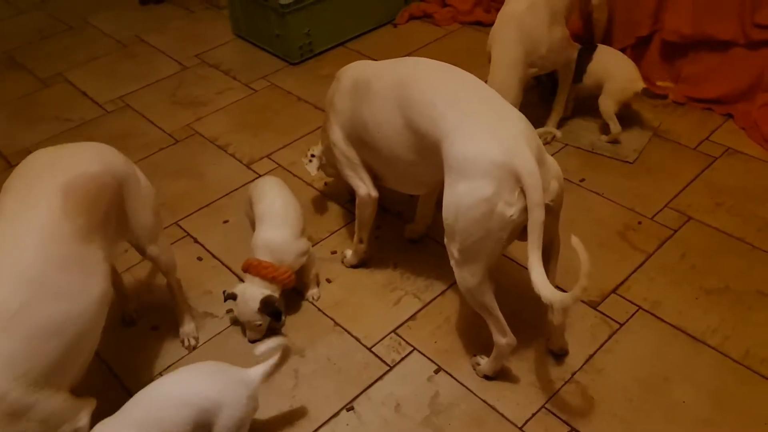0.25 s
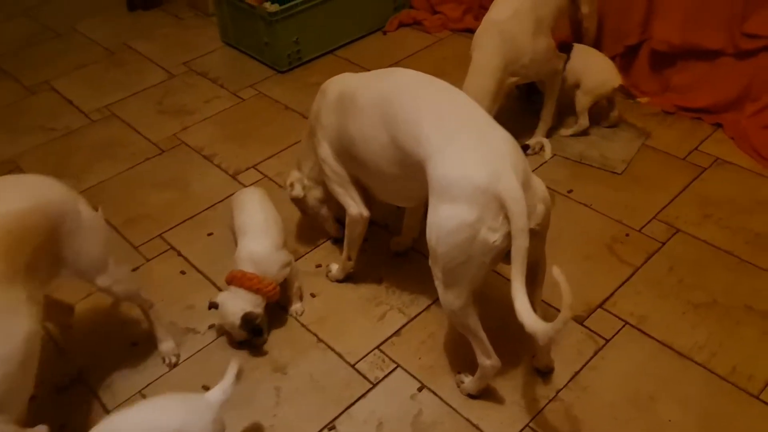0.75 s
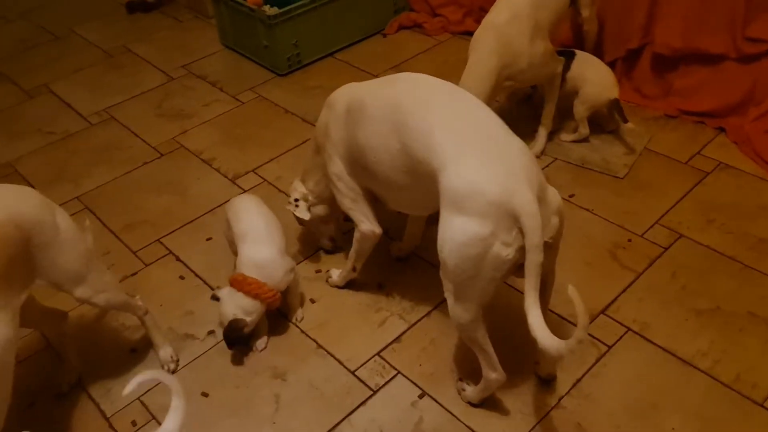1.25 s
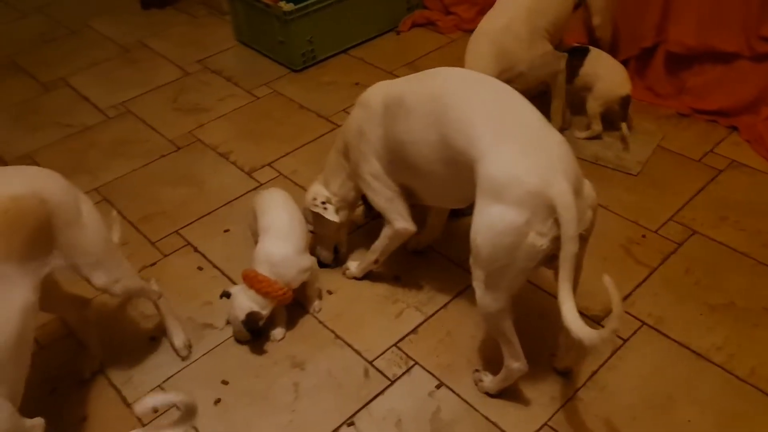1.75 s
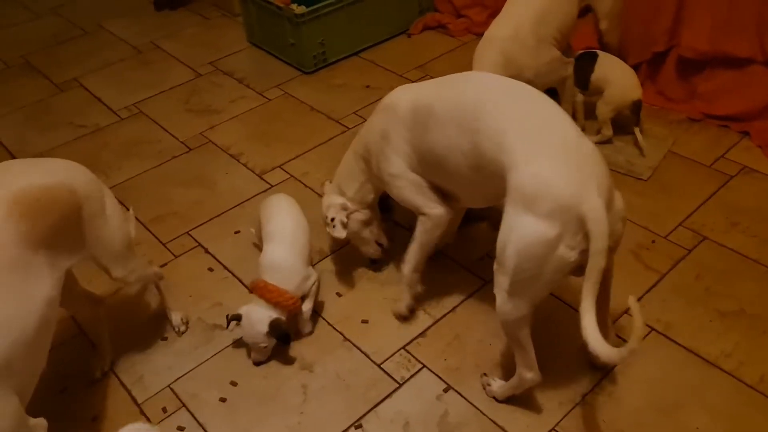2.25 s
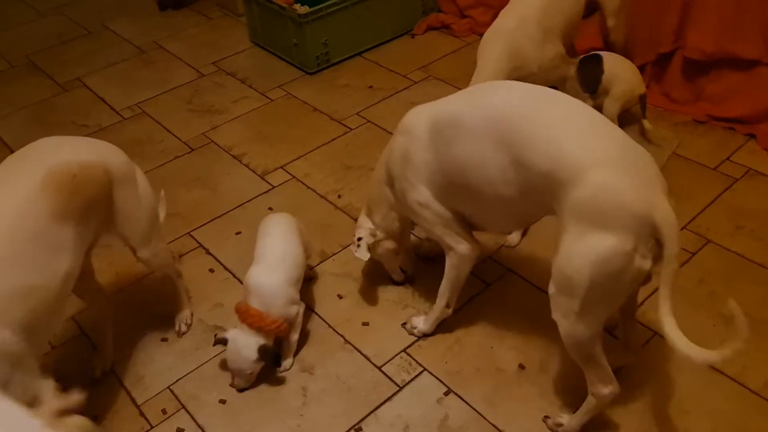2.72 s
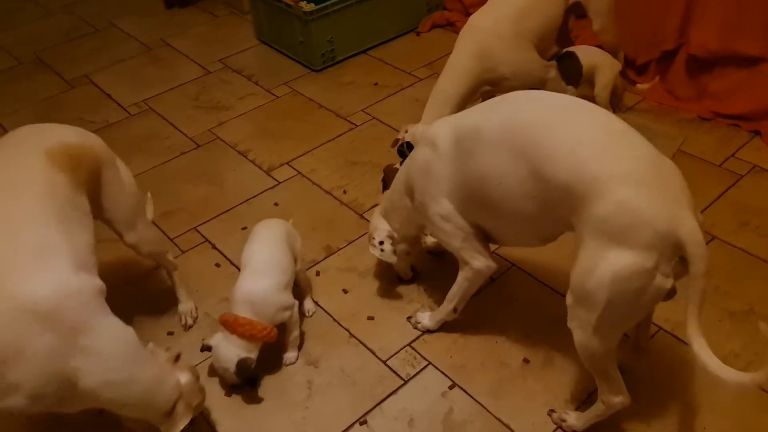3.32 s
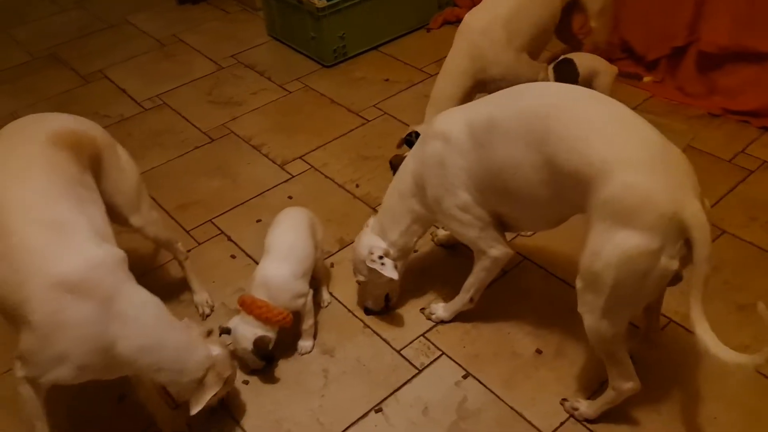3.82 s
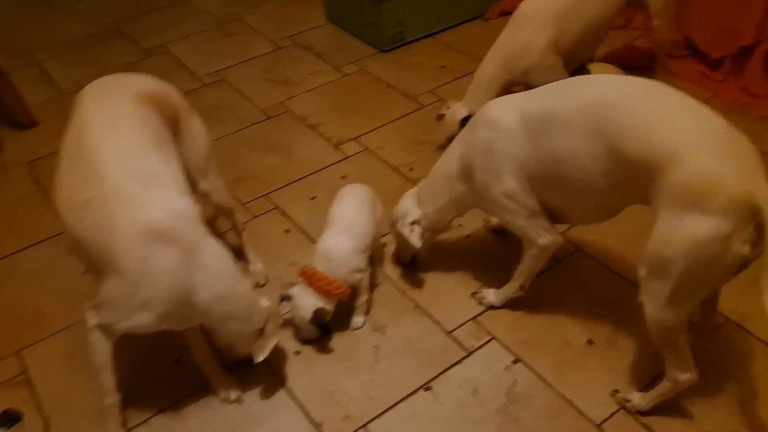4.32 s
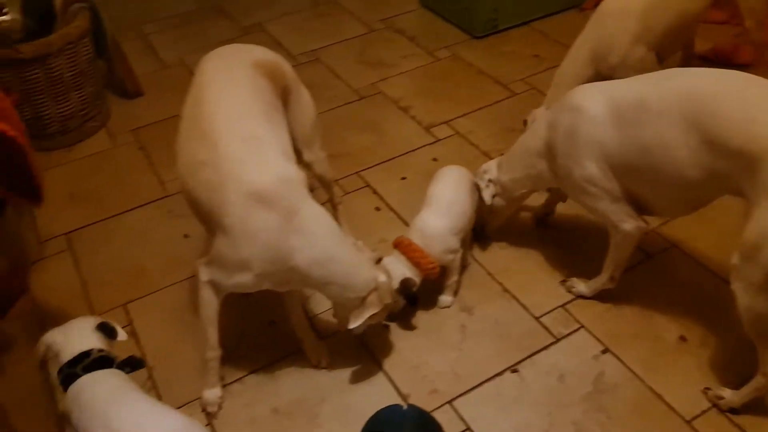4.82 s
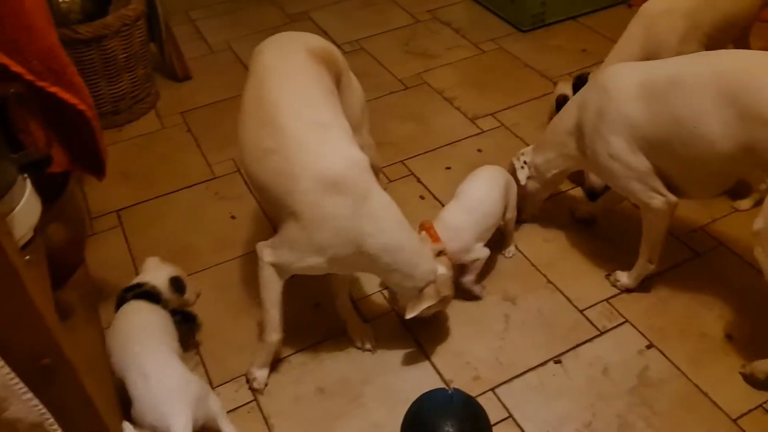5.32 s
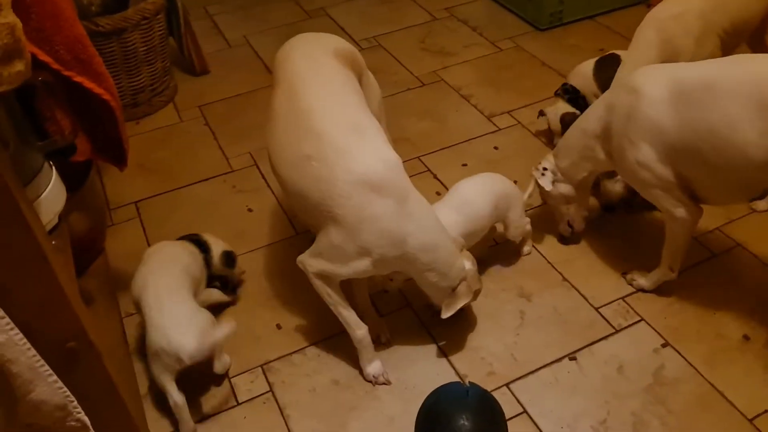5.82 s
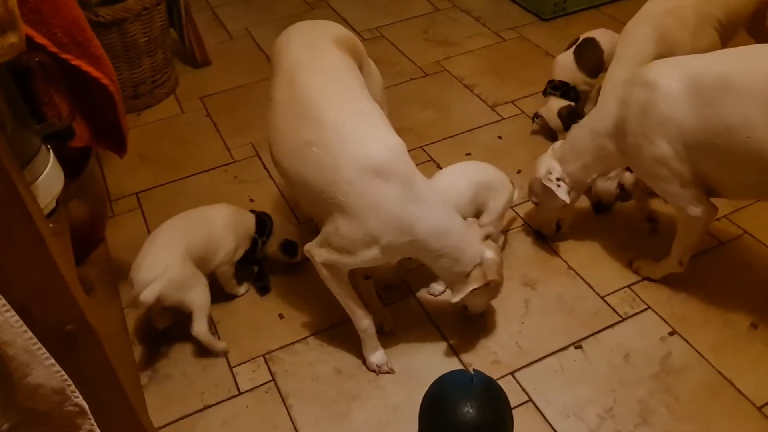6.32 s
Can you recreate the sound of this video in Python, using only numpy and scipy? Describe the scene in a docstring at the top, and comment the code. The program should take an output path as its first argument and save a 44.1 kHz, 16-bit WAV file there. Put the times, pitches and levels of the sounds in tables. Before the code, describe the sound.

Dogs and puppies eat scattered dry kibble off a tiled kitchen floor: one loud burst of crunching, then faint snuffles, clicks and ticks.

```python
"""Pellets of dry kibble crack between the teeth of dogs and puppies eating off a tiled floor in a small hard room.
Cracks are short noise bursts through pellet, jaw and treble bands; smacks are two mouth modes; snuffles are
fluttering noise through a nose resonance and a sinking hollow. Soft bodies thud, claws and crumbs tick.
Scattered echoes surround them, an appliance hums under room hiss, and two spaced microphones listen."""
import sys
import numpy as np
from scipy import signal
from scipy.fft import rfft, irfft, next_fast_len
from scipy.io import wavfile
from scipy.ndimage import uniform_filter1d

SR = 44100
rng = np.random.default_rng(int(sys.argv[2]) if len(sys.argv) > 2 else 0)


def waveform_to_disk(signal):
    """Save audio, clipped to [-1, 1], as 16-bit WAV at the path in sys.argv[1]."""
    frames = np.transpose(np.atleast_2d(signal))
    scaled = np.clip(frames, -1, 1) * 32767
    samples = np.round(scaled).astype(np.int16)
    wavfile.write(sys.argv[1], SR, samples)


N = 289296  # samples

# Levels in these tables are source levels, ahead of the room, mix and microphones.
# Pellets breaking and claws on tile. Each row: start in seconds, level in dB, centre in Hz, treble snap in dB
# against the body, jaw knock in dB against the body, left over right in dB, room send in dB.
CRACKS = [(0.0064, -24, 2800, 0.5, -21, -6.5, -3), (0.0232, -45.5, 2880, 3, -5, 2, 12),
          (0.4933, -50, 4170, -11, -28, -2.5, -7), (0.5409, -41, 2660, -25, -35, -7, -10),
          (0.5457, -41.5, 2590, -18, -36, -4, 2), (0.563, -37.5, 3830, 3, -14, -4, -9),
          (0.5985, -52, 4400, -5, -15, -3.5, -2), (0.6316, -45.5, 2830, -10, -7, -1, 4.5),
          (0.9131, -44.5, 2400, -1, -4, -1, 7), (0.989, -34, 2900, -15, -10, -11, -6),
          (1.021, -38.5, 2380, 0, -9, 2, 0.1), (1.0705, -36, 3100, 11, 8, -7, 3),
          (1.1052, -42, 3040, -2, 11, -2, 4.5), (1.3277, -10, 3860, 11.5, -19, -11.5, -8.5),
          (1.3295, -15, 3350, 10, -33, -5, 0), (1.3452, -28, 2550, -2, -24, 6, 3),
          (1.3712, -12, 3100, -12, -18, -8.5, -5), (1.391, -9.5, 3500, 11.5, -18.5, -6.5, -4),
          (1.4069, -11.5, 2960, 3.5, -31, -4.5, -0.1), (1.4726, -6, 3370, 9, -13, -13, -7),
          (1.4757, -3, 3440, 16, -16, -1, -4.5), (1.4803, -12.5, 5470, -1, -13, -24, -8),
          (1.4976, -23.5, 2450, -9, -18, -6, 1), (1.5346, -22, 2410, -14, -12.5, 1.5, -3),
          (1.659, -38, 1810, 1, -19, -4, 2), (1.6826, -22.5, 4990, 4, -19.5, -6, -2),
          (1.6854, -27, 2650, 3, -30, -12, -5), (1.689, -25, 3420, 0.5, -21, -2, -1),
          (1.7034, -16, 3020, 10, -15, -9, -8), (1.708, -22, 2500, 10, -12, -12, 4),
          (1.7336, -12.5, 2900, 1.5, -17.5, -4.5, -0.5), (1.8437, -22, 3200, 9, -23, 4, -13),
          (1.8465, -13, 3000, 9, -24, -5.5, 0.8), (1.8544, -16.5, 2450, 10, -27, -7.5, -13),
          (1.8679, -19.5, 4160, 4.5, -16, 0, -1.5), (1.957, -23, 2450, 13, -44, -4.5, 0.5),
          (1.967, -38, 2610, 6, -22, -2, 3), (1.9966, -35.5, 3100, -3, -16, -4, 4),
          (2.002, -24, 3550, 11, -26, -6, -1), (2.0364, -26, 6020, 12, -26, -4, 0.1),
          (2.0428, -16, 2540, 19, -39, -5, -3.5), (2.0468, -24, 4050, -0.5, -29, -4, -3.5),
          (2.0529, -28, 1940, 8, -28, -5.5, -1.8), (2.137, -32.5, 3470, -9, -11, -7, 0.1),
          (2.158, -29.5, 3290, 3, -25, -9, -18), (2.1747, -31, 2550, 14, -11, -3, -1.5),
          (2.226, -44.5, 3060, 7, -3, -11, 9), (2.4937, -31, 2500, -18, -37, -9, -13),
          (2.5335, -36, 3940, -22, -22, -4, -0.5), (2.5778, -43, 4500, 4, -15, -4, 2),
          (2.8924, -42, 1880, 35, -13, -1, -3), (2.97, -37.5, 3440, -10, -31, -3, 13.5),
          (3.1282, -34.5, 1860, -5, 8, -5, 2), (3.276, -37, 1950, -17, -17, -3, -1.5),
          (3.3126, -44, 1920, 9, -6, -4, 8.5), (3.368, -30.5, 2290, 7, -25, -4, 3),
          (3.487, -32.5, 2900, -18, -34, 0, -8), (3.495, -31.5, 2770, -16, -32, -8, -18),
          (3.504, -39.5, 3230, 6, -10.5, -0.5, 7.5), (3.5987, -44.5, 1820, -12, -12, 4, 0),
          (3.7458, -42, 5740, 7.5, -12, -5.5, 4.5), (3.903, -42, 1860, -5, -29, -8, -9),
          (4.1243, -50.5, 6600, -4, -20, -6, 3), (4.1856, -43, 1740, -8, -17, -7, -5),
          (4.437, -46, 2820, 9, -33, -6, 6), (4.4799, -34, 3340, -1, -28, -5, -3),
          (4.5502, -38, 2090, -10, -46, -8, -4), (4.7717, -42.5, 2210, -19, -22, -23, 7),
          (4.7853, -45, 3830, -20, -18, -8, -16), (4.852, -27.5, 2580, -20, -8, -7, -2),
          (4.898, -35, 4500, 20, -20, -4, -7), (4.9117, -32, 2200, 10, -8, -4, -15),
          (5.0175, -33, 2820, 3.5, -11, -5, -3.5), (5.116, -51.5, 3130, -4, -10, -3, -4),
          (5.1815, -44, 2670, -4, -2, -15, -6), (5.34, -51, 3020, -15, -12, -7, -10),
          (5.4301, -44.5, 2800, -6, -19, -10, 2), (5.4538, -41, 2700, -11, -20, -7, 1),
          (5.5638, -31, 2270, 2, -22, -4, 2.5), (5.7516, -43, 1800, -4, -36, -26, 7.5),
          (5.7684, -26, 2900, 5, -25, -2.5, -7), (5.9148, -38, 1900, 5, -10, -5, -4),
          (5.9367, -46, 5500, -7, -12, -1, -10), (6.0969, -43.5, 3900, 6, -9, -5, 5.5),
          (6.46, -49, 7000, -8, -24, -6, -9), (6.4832, -34, 3130, -7, -27, -5, 3),
          (6.5332, -36.5, 2030, -6, -10, -12, -9)]
# Hollow smacks of lips and tongue. Each row: start in seconds, level in dB, mouth mode in Hz, upper mode in Hz,
# upper mode in dB against the mouth mode, ring time in ms, room send in dB.
SMACKS = [(0.661, -49, 670, 2900, -9, 2, -15), (0.68, -43.5, 1120, 2380, -4, 1.2, -14),
          (0.69, -41.5, 776, 2040, -14, 0.4, 9), (0.707, -42, 810, 2460, -4, 1.2, -7),
          (0.927, -51.5, 1450, 2590, 10.5, 1.7, -6), (0.945, -48, 1310, 2970, 7, 1.7, -6),
          (0.959, -44, 1220, 2600, -4, 0.83, -16), (0.999, -49.5, 1170, 2330, -7, 1.6, 4),
          (1.07, -41.5, 990, 3330, 1, 1.16, 0.5), (1.109, -46, 755, 3040, -1.5, 2.4, -6),
          (1.136, -47, 790, 2580, -9, 1.4, -5), (1.186, -42.5, 707, 1777, -2, 3.3, -3.5),
          (1.643, -47, 680, 3580, -7, 1.3, 1), (2.12, -42, 880, 3060, -4, 0.82, -1.5),
          (3.032, -41.5, 1160, 3280, -15, 1, -4), (3.131, -45.5, 1230, 2620, -26, 1.2, 0),
          (3.276, -46.5, 667, 1950, -1.5, 1.8, -2.5), (3.37, -43, 538, 2140, 1.5, 2.15, -6.5),
          (3.543, -25, 1614, 1940, -7.5, 1.34, -6), (3.648, -50, 1120, 2240, -18, 1.5, -19),
          (3.814, -42, 990, 1770, -13, 0.89, -3), (3.99, -56, 700, 2120, -13, 1.8, -8),
          (4.255, -46, 1720, 1785, -3, 0.98, -2), (4.262, -53.5, 1010, 1870, -24, 3.5, -8),
          (4.279, -40, 516, 1910, -19.5, 0.67, -6.5), (4.98, -37.5, 567, 2070, -11, 0.87, -4),
          (5.177, -45.5, 640, 2620, -3, 1.1, 0.5), (5.451, -52.5, 1020, 2610, 6, 2.1, -9),
          (5.561, -42.5, 1640, 1750, -20, 1.4, -5), (5.659, -47.5, 840, 1930, -17, 3.3, -1),
          (5.784, -47, 1690, 2850, -3, 2, -4.5), (5.915, -44.5, 567, 1900, -16, 1.95, -1)]
# Puffs of snuffling and chewing. Each row: peak time in seconds, peak level in dB, rise in ms, fall in ms,
# nose resonance in Hz, hollow at the peak in Hz, treble hiss in dB and hollow in dB, both against the nose.
SNUFFLES = [(0.146, -61, 29, 48, 2300, 760, -20, -5), (0.238, -68, 65, 100, 2700, 1050, -14, -19),
            (0.358, -63, 28, 106, 2060, 750, -19, -2), (0.416, -59, 38, 72, 3070, 770, -1, -25),
            (0.594, -51, 39, 34, 2700, 940, 1.5, -18), (0.7, -52, 60, 40, 2600, 730, 1.5, 1.5),
            (0.756, -50, 55, 86, 2370, 905, -3, -13), (0.93, -53.5, 15, 120, 2550, 1140, -5, -10),
            (0.985, -45, 16.3, 58, 2780, 1150, -17, -9.5), (1.075, -54, 21, 127, 3120, 930, -4, -2),
            (1.138, -62.5, 60, 150, 3020, 794, -4, 8), (1.194, -57.5, 60, 160, 1800, 700, -3, -12),
            (2.1, -60, 96, 134, 2770, 1080, 10.5, -0.5), (2.164, -53, 80, 25, 2960, 1100, -5, -5),
            (2.3, -43, 85, 90, 3200, 1110, -2, -22), (2.36, -42, 90, 105, 3200, 1170, -1, -22),
            (2.416, -50.5, 64, 38, 2830, 950, -4, 1.5), (2.498, -66, 56, 9.7, 2590, 1000, -12, -17),
            (2.54, -60.5, 50, 153, 3400, 1310, -13, -2), (2.605, -55.5, 10, 29.5, 2780, 770, -7, 2),
            (2.644, -57.5, 14.6, 69, 2290, 1290, -11, 0.5), (2.725, -65.5, 16, 124, 3480, 1000, 14.5, -14),
            (2.75, -54, 60, 86, 2140, 950, 3.5, 6), (2.982, -43.5, 25.2, 68, 2800, 1560, 1.5, -9.5),
            (3.06, -63.5, 40, 140, 2750, 930, -4, 1), (3.14, -63, 23, 80, 1860, 1170, 15, 0),
            (3.234, -63, 150, 32, 2200, 820, -13, -3), (3.285, -56, 16.6, 86, 2020, 830, -13, -14),
            (3.385, -51, 39.6, 108, 2370, 740, 2, -10), (3.46, -68.5, 57, 34, 2100, 1190, -9, 13),
            (3.563, -48.5, 15, 58, 1660, 1450, -7, -22), (3.644, -63.5, 32, 87, 1680, 1240, 1, 4),
            (3.76, -67.5, 20, 234, 2320, 820, -2, 0), (3.9, -59, 27, 190, 2200, 1000, -4, -25),
            (3.988, -64, 29, 164, 2740, 860, 3, -3), (4.195, -58, 15, 33, 1850, 1150, -10, -18),
            (4.264, -55, 70, 70, 1770, 940, -8, 1), (4.506, -59.5, 128, 170, 2370, 1250, -4, -10),
            (4.59, -74.5, 40, 25, 2100, 720, -9, 14.5), (4.678, -62.5, 40, 80, 2190, 550, -1, -25),
            (4.79, -56, 20, 150, 3300, 1150, -15, -20), (4.85, -48.5, 85, 100, 2480, 1090, -4, 1),
            (4.9, -58, 54.6, 154, 2230, 920, 3, 12), (4.96, -67, 68, 55, 1670, 670, 0, 6),
            (5.018, -61, 9.3, 34, 2590, 616, 8, -18), (5.118, -61, 16.7, 114, 3100, 650, 1.5, -20),
            (5.224, -55, 57, 82, 2170, 1170, -10, 4.5), (5.265, -66.5, 52, 43, 1830, 1100, -11, 14.5),
            (5.346, -58, 19.7, 79, 2510, 930, -15, -24), (5.432, -64, 11.4, 330, 2680, 990, -7, -12),
            (5.545, -50, 76, 139, 2050, 1150, -6, -5.5), (5.664, -60.5, 99, 78, 2340, 860, 4.5, 4),
            (5.785, -58, 23, 110, 2900, 1160, 0, -4), (5.866, -61, 89, 190, 2380, 750, -5, -5),
            (5.93, -65.5, 54, 125, 2300, 566, -5, 4.5), (6.1, -63.5, 144, 310, 2800, 1110, -7, -4.5),
            (6.42, -65, 60, 80, 1790, 1010, -7.5, 1), (6.535, -51.5, 54, 60, 1960, 1200, 2, -10)]
# Soft bodies bumping the tiles. Each row: peak time in seconds, peak level in dB, rise in ms, fall in ms, centre in Hz.
THUDS = [(1.699, -55, 59, 53, 181), (1.76, -59, 55, 29, 426), (4.609, -50.5, 74, 58, 250),
         (4.692, -60, 62, 50, 370)]
# How long each band of the room rings. Each row: frequency in Hz, time to die by 60 dB in seconds.
ROOM_DECAY = [(300, 0.61), (800, 0.17), (2000, 0.33), (5500, 0.26), (9000, 0.3), (15000, 0.24)]
# Tone of the background hiss. Each row: frequency in Hz, relative level in dB.
HISS_TONE = [(15, -52), (30, -26), (60, -12.5), (110, -8), (150, -9), (300, -9.5), (460, -10), (1130, -12),
             (2270, -15), (5110, -23.5), (7800, -21.5), (9400, -37.5), (12000, -36), (15700, -37),
             (16100, -58)]
# The low hum wavers. Each row: time in seconds, level in dB before the left-right balance.
HUM_LEVEL = [(0.0, -77), (0.13, -78), (0.42, -67.5), (0.62, -83), (0.75, -64), (0.89, -77), (1.86, -72.5),
             (2.01, -66.5), (2.26, -81), (2.7, -70.5), (2.79, -87), (2.98, -72.5), (3.87, -79.5),
             (6.56, -78)]
# Left-right likeness of the hiss. Each row: frequency in Hz, correlation from -1 to 1.
HISS_LIKENESS = [(60, 0.7), (180, 0.7), (550, -0.11), (1650, -0.57), (4970, -0.22), (15000, 0.36)]
# Microphone tone on the eating sounds. Each row: frequency in Hz, gain in dB.
MICROPHONE = [(60, -15.5), (250, -7.5), (600, -0.5), (1500, 0), (6500, 0), (8300, -1.5), (9300, -9),
              (11000, -9.5), (13000, -10), (15600, -11.5), (16000, -26), (16700, -33)]
# Tone difference of the two ports. Each row: frequency in Hz, gain of left over right in dB.
PORTS = [(100, 0), (300, 3), (700, 4), (2500, -2), (6000, 3), (9500, 5), (13000, 1)]

HISS_DB = -64.5  # before the left-right balance
HUM_HZ, HUM_WIDTH_HZ = 74.3, 12.6  # width of each of two resonator passes
UPPER_HUM_HZ, UPPER_HUM_WIDTH_HZ, UPPER_HUM_DB = 219, 12.7, -77
TICKS_PER_S, TICKS_DB = 64, -54.5  # level of the smallest tick, before panning and mixing
CRACK_MS, SNAP_MS = 1.95, 1.32  # decay time constants: the treble snap is briefer
CRACK_OCTAVES, WIDER_PER_DB = 1.194, 0.008  # body width at 0 dB; hard bites ring wider
WALL_TREBLE_DB = -2  # at 10 kHz: cloth in the room swallows some treble
SAG_OCTAVES_PER_S, HOLLOW_RANGE_HZ = 3.5, (520, 1500)  # the hollow sinks as the snout closes
SWELL_DB, SWELL_ROUND = 20, 1.3  # rise and fall are timed over this depth; the top is rounded
LEFT_DB, RIGHT_LAG = -5, 1  # the right port is louder and hears later (samples)
EDGE_HZ = 16800  # upper band limit


def gain_of(db):
    """Turns decibels into an amplitude factor."""
    return 10 ** (np.asarray(db) / 20)


def evened(x):
    """Brings each channel to an RMS of one."""
    return x / np.sqrt(np.mean(x ** 2, axis=-1, keepdims=True) + 1e-20)


def read(points, hz):
    """Reads a curve between its points on a log frequency scale."""
    f, value = np.transpose(points)
    return np.interp(np.log(hz + 1), np.log(f + 1), value)


def add(mix, s, sound):
    """Lays a sound into the mix at s seconds, cutting it at the end."""
    part = mix[..., round(s * SR):][..., :sound.shape[-1]]
    part += sound[..., :part.shape[-1]]


def coloured(x, gain):
    """Weights the spectrum of x by the function gain(Hz)."""
    size = next_fast_len(x.shape[-1])
    spectrum = rfft(x, size) * gain(np.fft.rfftfreq(size, 1 / SR))
    return irfft(spectrum, size)[..., :x.shape[-1]]


def resonate(x, hz, width):
    """Shifts the curve hz down to zero, smooths, and shifts back: a resonance of gain 1."""
    turn = np.exp(2j * np.pi * np.cumsum(hz * np.ones(x.shape[-1])) / SR)
    r = np.exp(-np.pi * width / SR)
    return 2 * (turn * signal.lfilter([1 - r], [1, -r], x / turn + 1e-18)).real


def resonate_twice(x, hz, width):
    """Two equal resonances in a row, for steeper skirts."""
    return resonate(resonate(x, hz, width), hz, width)


def pair(size, same, pan_db):
    """Noise for two ports that hear partly different paths."""
    both, own = rng.standard_normal(size), rng.standard_normal((2, size))
    same = np.clip(same, 0, 1)
    return (np.sqrt(same) * both + np.sqrt(1 - same) * own) * gain_of([[pan_db / 2], [-pan_db / 2]])


def flutter(size, depth_db, smooth):
    """A random wavering of gain, smoothed over a number of samples."""
    drift = uniform_filter1d(rng.standard_normal(size), size=smooth)
    return gain_of(depth_db * evened(drift))


def uneven(depth_db, hz_apart):
    """A random row of peaks and dips: every pellet and mouth shape rings differently."""
    at = np.arange(0, SR / 2 + hz_apart, hz_apart)
    db = depth_db * rng.standard_normal(200)[:len(at)]
    return lambda f: gain_of(np.interp(f, at, db))


def bell(hz, octaves):
    """A bell-shaped band on a log frequency scale; octaves is its standard deviation."""
    return lambda f: np.exp(-.5 * (np.log2((f + 1) / hz) / octaves) ** 2)


def swell(db, rise_ms, fall_ms):
    """Time from the peak, and a level that climbs to the peak and sinks away."""
    rise, fall = max(rise_ms, 5) / 1000, max(fall_ms, 5) / 1000
    t = np.arange(-2 * rise, 2 * fall, 1 / SR)
    return t, gain_of(db - SWELL_DB * np.where(t < 0, -t / rise, t / fall) ** SWELL_ROUND)


def room_hiss():
    """Room tone and microphone hiss: spectral noise in drifting patches, with likeness set by frequency."""
    frames, hz = N // 512 + 5, np.fft.rfftfreq(2048, 1 / SR)
    a, b, c, d, patches = rng.standard_normal((frames, 1025, 5)).T
    patches = uniform_filter1d(patches, size=30, axis=0)
    patches = uniform_filter1d(patches, size=8, axis=1)
    same = np.clip(read(HISS_LIKENESS, hz), -1, 1)[:, None]
    left = a + 1j * b
    right = same * left + np.sqrt(1 - same ** 2) * (c + 1j * d)
    tone_db = read(HISS_TONE, hz)[:, None] + 2.0 * patches / np.std(patches)
    z = np.array([left, right]) * gain_of(tone_db)
    return gain_of(HISS_DB) * evened(signal.istft(z, nperseg=2048, noverlap=1536)[1][:, :N])


def appliance_hum():
    """Two narrow noise resonances: a wavering low hum and a steadier upper one."""
    low = evened(resonate_twice(pair(N, 0.85, 0), HUM_HZ, HUM_WIDTH_HZ))
    upper = evened(resonate_twice(pair(N, 0.85, 0), UPPER_HUM_HZ, UPPER_HUM_WIDTH_HZ))
    low_db = np.interp(np.arange(N) / SR, *np.transpose(HUM_LEVEL))
    return gain_of(low_db) * low + gain_of(UPPER_HUM_DB) * upper


def background():
    """Hiss and hum together, turned down on the left and up on the right."""
    return (room_hiss() + appliance_hum()) * gain_of([[-2.0], [2.0]])


def ticks():
    """Faint crumbs and claw tips: short rings at twelve pitches and random moments."""
    out, t = np.zeros((2, N)), np.arange(200) / SR
    for hz in np.geomspace(1500, 12000, num=12):
        boost_db = 3.0 * np.minimum(rng.exponential(1, N), 4)
        hits = gain_of(boost_db) * (rng.random(N) < TICKS_PER_S / 12 / SR)
        tick = np.sin(2 * np.pi * hz * t) * np.exp(-t * hz / 1.5)  # dies over 1.5 cycles
        out += signal.oaconvolve(hits, tick)[:N] * rng.uniform(0.58, 1, (2, 1))
    return gain_of(TICKS_DB) * out


def crack(db, hz, treble_db, knock_db, pan_db):
    """A spray of tiny fractures: a noise burst through the broad ring of pellet and jaw, plus a treble snap."""
    t = np.arange(1024) / SR
    splinters = pair(len(t), 0.31, pan_db) * flutter(len(t), 3.84, 16)
    splinters = coloured(splinters, uneven(3, 450))
    body = coloured(splinters, bell(hz, max(CRACK_OCTAVES + WIDER_PER_DB * db, .3)))
    snap = coloured(splinters, bell(14500, 0.32))
    knock = coloured(splinters, bell(900, 0.69))
    shape = np.minimum(t / 0.00066, 1) ** 2 * np.exp(-t * 1000 / CRACK_MS)
    sound = body / np.std(body) * shape
    sound += gain_of(treble_db) * snap / np.std(snap) * shape ** (CRACK_MS / SNAP_MS)
    sound += gain_of(knock_db) * knock / np.std(knock) * shape ** 0.85  # the jaw rings longer
    return gain_of(db) * sound * np.linalg.norm(shape) / np.linalg.norm(sound)


def room(x):
    """Scattered reflections with an early bulge, each band dying at its own speed."""
    taps = np.zeros((2, SR // 2))
    slots = np.arange(120, SR // 2 - 20, 16)
    at = slots + rng.integers(0, 16, (2, len(slots)))
    np.put_along_axis(taps, at, rng.choice([-1., 1.], at.shape), 1)
    hz, t, z = signal.stft(taps, SR, nperseg=128)
    build = .5 + 0.21 * np.exp(-((t - .02) / 0.0027) ** 2)  # walls answer together after about 20 ms
    decay_db = -60 * t / read(ROOM_DECAY, hz)[:, None]
    treble_db = WALL_TREBLE_DB * (hz[:, None] / 10000) ** 2
    tail = signal.istft(z * build * gain_of(decay_db + treble_db), SR, nperseg=128)[1]
    return signal.fftconvolve(x, tail / np.linalg.norm(tail[0]), axes=1)[:, :N]


def snuffle(s, db, rise_ms, fall_ms, hz, hollow_hz, treble_db, hollow_db):
    """Fluttering air through the nostrils: an upper resonance, a sinking low hollow and hiss."""
    t, level = swell(db, rise_ms, fall_ms)
    air = pair(len(t), 0.14, LEFT_DB) * flutter(len(t), 3, 150)
    air = coloured(air, uneven(2.34, 340))
    nose = resonate_twice(air, hz, 3650)
    nose = coloured(nose, lambda f: 1 / (1 + (0.47 * hz / (f + 1)) ** 4))  # narrow nostrils thin the bass
    low_hz = np.clip(hollow_hz * 2 ** (-SAG_OCTAVES_PER_S * t), *HOLLOW_RANGE_HZ)
    hollow = resonate_twice(air, low_hz, 560)
    hiss = coloured(air, lambda f: 1 / (1 + (5500 / (f + 1)) ** 4))
    mixed = nose / np.std(nose)
    mixed += gain_of(hollow_db) * hollow / np.std(hollow)
    mixed += gain_of(treble_db) * hiss / np.std(hiss)
    return s + t[0], level * mixed


def smack(db, hz, upper_hz, upper_db, ms):
    """The mouth hollow rings on two modes for a few cycles as wet lips part."""
    t = np.arange(2048) / SR
    tau = max(ms, .4) / 1000
    # start phases in cycles, by port and mode: the right port is ahead by a random part of a cycle
    start = rng.random((2, 1)) + np.array([[[0]], [[1]]]) * rng.uniform(0.073, 0.62, (2, 1))
    modes = np.sin(2 * np.pi * (np.array([[hz], [upper_hz]]) * t + start)) * gain_of([[0], [upper_db]])
    wet = flutter(len(t), 3, 40)
    shape = (t / tau) * np.exp(1 - t / tau)
    ring = modes.sum(1) * wet * shape * np.linalg.norm(shape) / np.linalg.norm(wet * shape)
    return gain_of(db) * ring * gain_of([[LEFT_DB / 2], [-LEFT_DB / 2]])


def thud(s, db, rise_ms, fall_ms, hz):
    """A soft body on stone: low lumpy noise."""
    t, level = swell(db, rise_ms, fall_ms)
    push = resonate_twice(pair(len(t), 1.0, LEFT_DB), hz, 290)
    return s + t[0], level * push / np.std(push)


def scene():
    """Sharp mouth sounds and soft floor sounds, each mixed dry and through the room."""
    near = np.zeros((2, N))
    sent = np.zeros((3, 2, N))  # three scattered echo tails, taken in turn by the cracks and smacks
    for play, table in ((crack, CRACKS), (smack, SMACKS)):
        for k, (s, *values, room_db) in enumerate(table):
            sound = play(*values)
            add(near, s, sound)
            add(sent[k % len(sent)], s, gain_of(room_db) * sound)
    soft = ticks()
    for play, table in ((snuffle, SNUFFLES), (thud, THUDS)):
        for row in table:
            add(soft, *play(*row))
    echoes = sum(room(send) for send in sent)
    return near + gain_of(-1.5) * echoes + gain_of(-3.0) * soft + gain_of(-9.5) * room(soft)


def record(dry):
    """Microphone colour, port spacing, background, port tone, then the band limit."""
    heard = coloured(dry, lambda f: gain_of(read(MICROPHONE, f)))
    heard[1] = np.roll(heard[1], RIGHT_LAG)
    edge = signal.firwin(511, EDGE_HZ, window=("kaiser", 9), fs=SR)
    ports = coloured(heard + background(), lambda f: gain_of(read(PORTS, f) * [[.5], [-.5]]))
    return signal.oaconvolve(ports, edge[None], "same")


dry = scene()
out = record(dry)
waveform_to_disk(out)
```